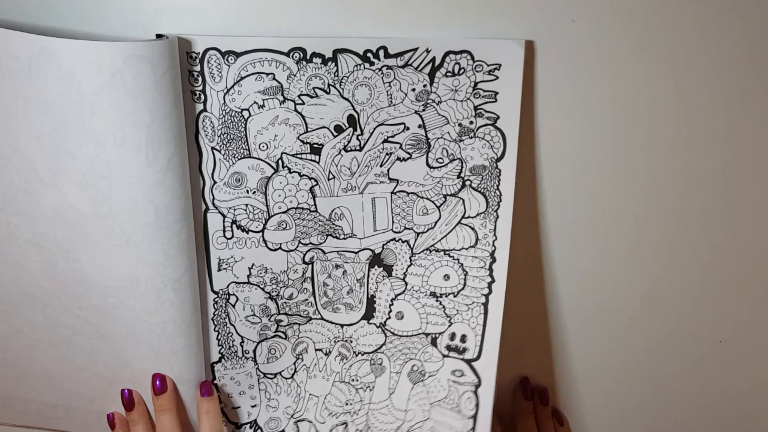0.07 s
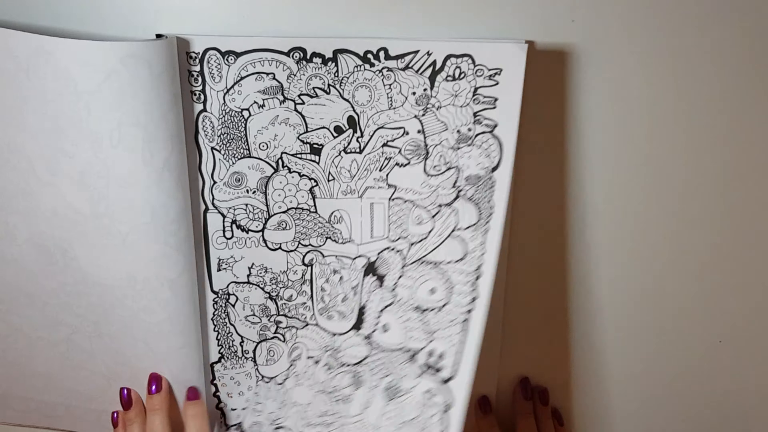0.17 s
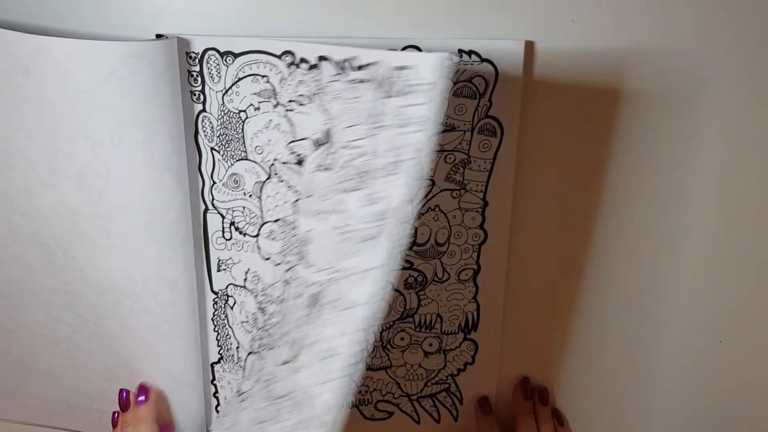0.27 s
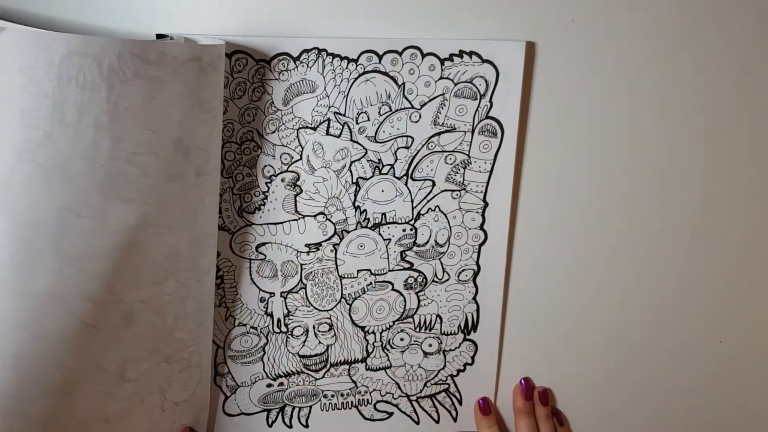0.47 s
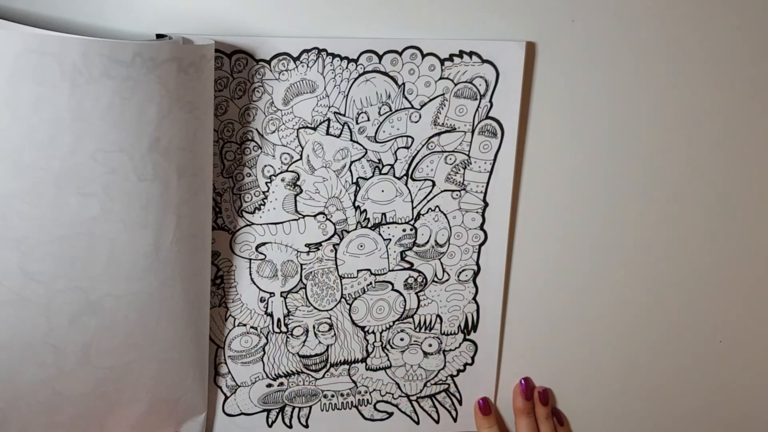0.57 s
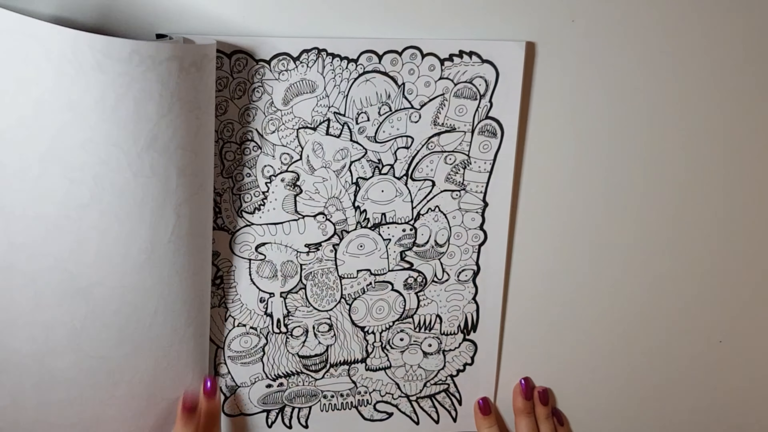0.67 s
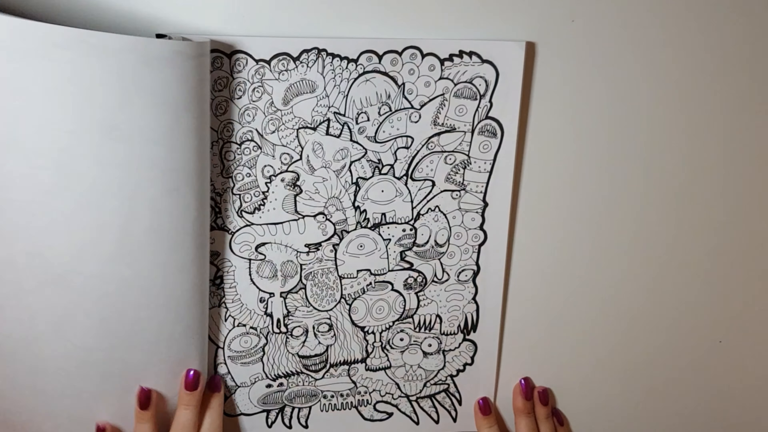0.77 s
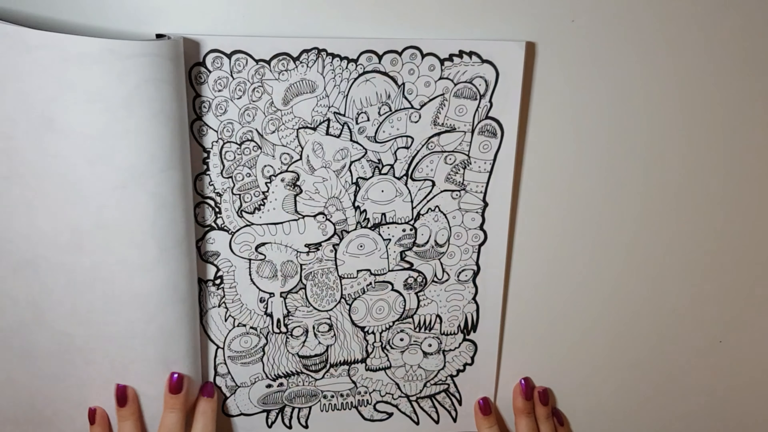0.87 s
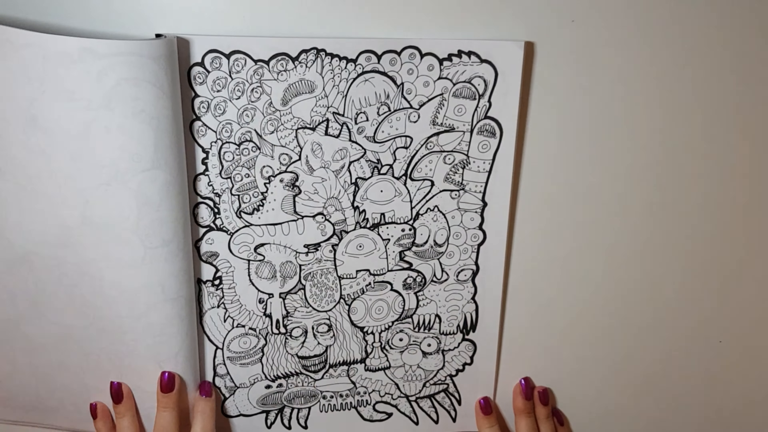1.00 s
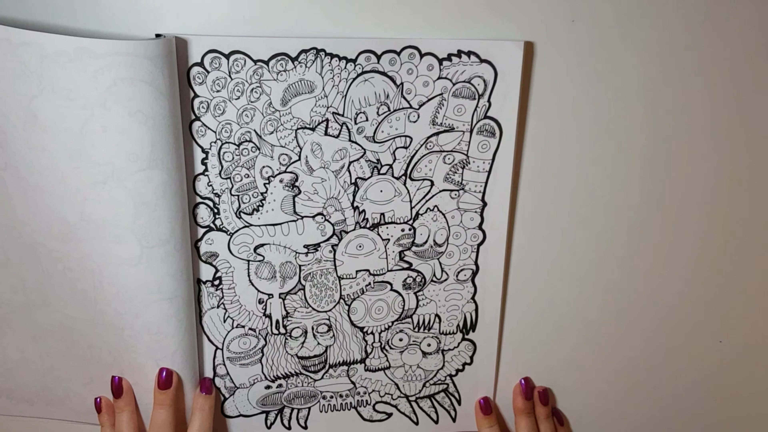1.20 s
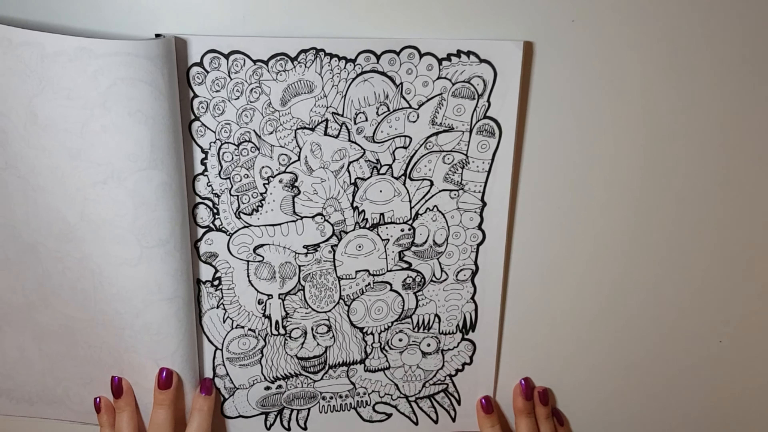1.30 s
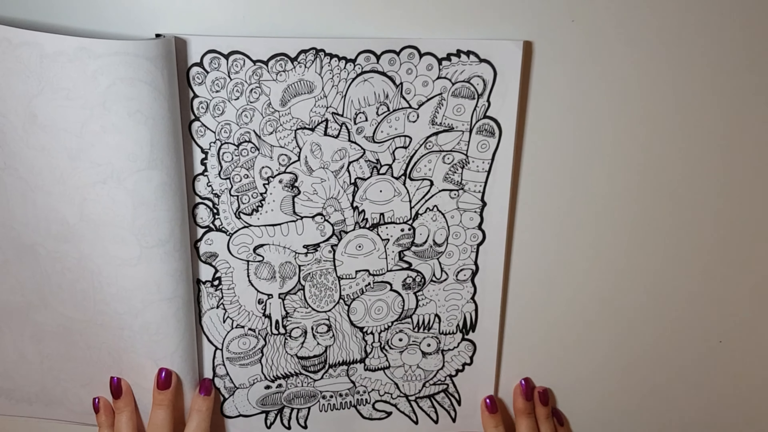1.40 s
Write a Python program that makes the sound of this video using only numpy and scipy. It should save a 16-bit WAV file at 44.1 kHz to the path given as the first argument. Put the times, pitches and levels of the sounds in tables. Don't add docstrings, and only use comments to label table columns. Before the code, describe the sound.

A large paper page is turned in a book, rustling, popping and crackling, then smoothed flat

```python
import sys
import numpy as np
from scipy import signal
from scipy.fft import rfft, irfft, next_fast_len
from scipy.io import wavfile

SR = 44100
rng = np.random.default_rng(int(sys.argv[2]) if len(sys.argv) > 2 else 0)


def to_wav(sig):
    pcm = np.clip(np.atleast_2d(sig), -1, 1) * 32767
    pcm = np.round(pcm).astype(np.int16)
    wavfile.write(sys.argv[1], SR, pcm.T)


def how_loud(loudness_db):
    steps = np.asarray(loudness_db, float) / 20
    return 10 ** steps


N = 63945

# [t/s, sliding speed as level/dB, pressure as body level/dB]
STROKES = [
    [(0.0, -59, 3), (0.026, -65.5, 3.5), (0.102, -56.5, -1.6), (0.228, -51, -2.3), (0.246, -59, 5),
     (0.3, -70.5, -23)],
    [(0.31, -66.5, 5.5), (0.482, -50, -0.8), (0.506, -55.5, 4.5), (0.596, -56.5, 0), (0.66, -70, 1)],
    [(0.67, -66, 2), (0.7, -62, -0.5), (0.748, -72, -11), (0.764, -68.5, 4), (0.767, -82, -9)],
    [(0.771, -51.5, 2), (0.873, -59.5, 2.5), (0.887, -52.5, 0), (0.901, -60.5, 3), (0.951, -53, -1),
     (0.995, -65, -0.7), (1.1, -68.5, -0.2)],
    [(1.11, -72, -15), (1.152, -80, -7), (1.176, -72, -10), (1.202, -65, -8.5), (1.272, -89.5, -2),
     (1.36, -97, 5)],
    [(1.375, -89, 11.5), (1.385, -77, 4.5), (1.397, -66, -2.5), (1.421, -60.5, 2.5), (1.443, -70.5, 2),
     (1.45, -59, 8)],
]
STROKE_SHEEN = [-2.5, -1, 1.5, 1, 3.2, 8]
# [f/Hz, level/dB per Hz]
FIBRE_SPECTRUM = [(1500, -16.5), (2500, -10), (3500, -8), (5300, -1), (7400, -7), (10500, -6.5),
                  (13500, -6.5), (15300, -11)]
# [f/Hz, level/dB per Hz]
BODY_SPECTRUM = [(350, -23), (550, -9.5), (900, -4), (1300, -4), (2300, 1), (3300, -2), (5000, -5.5),
                 (8000, -28)]
# [f/Hz, width/Hz, level/dB]
SHEET_RINGS = [(1150, 46, 2), (1717, 92, -1.5), (2630, 330, -5.5), (3713, 314, 2), (5225, 540, 1.5),
               (10500, 3200, -9)]
# [f/Hz, level/dB per Hz]
AIR_SPECTRUM = [(25, -28.5), (64, -.5), (110, -8), (170, -12.5), (350, -19.5), (1500, -24.5), (7000, -26.5),
                (13000, -22)]
# [f/Hz, likeness]
STEREO_LIKENESS = [(30, 0.64), (100, 0.29), (500, 0.53), (2000, 0.24), (5000, 0.041), (12000, 0.045)]
# [t/s, level/dB, length/s]
LEANS = [(.001, -68, 0.051), (0.198, -75, 0.06), (0.269, -56.5, 0.11), (0.377, -72, 0.05),
         (0.45, -54.5, 0.068), (0.486, -58.5, 0.12), (0.788, -70, .04), (0.886, -66, 0.086),
         (0.949, -71, 0.046), (1.004, -76, 0.054)]
# [f/Hz, level/dB]
TABLE_MODES = [(119, 4), (93, -9), (75, -9), (250, -12.5)]
# [t/s, peak level/dB, f/Hz, t60/s, left-right level/dB]
SHEET_SNAPS = [(.2752, -35, 1460, 0.035, 7), (.6201, -43.5, 650, 0.078, 3), (.6545, -45.5, 603, 0.13, 7),
               (.7692, -41.5, 1480, 0.041, 5.5), (.8823, -43, 1640, 0.082, -5),
               (1.4488, -38.5, 2540, .05, 5)]
# [t/s, peak level/dB, f/Hz, t60/s, left-right level/dB]
SHEET_CRUMPLES = [(.2802, -43, 696, 0.063, -1), (.3352, -46, 1280, 0.72, -2), (.414, -45, 930, 0.082, 12),
                  (.4282, -28, 1690, 0.082, 0), (.4332, -34, 656, 0.21, -4),
                  (.4402, -31.5, 1150, 0.057, -12), (.4465, -38.5, 635, .09, -1.5),
                  (.455, -40, 1760, 0.014, -9), (.4712, -37.5, 676, 0.1, 0), (.4872, -42, 760, 0.14, 3),
                  (.4952, -44, 2070, 0.17, 7), (.515, -40.5, 1320, 0.08, -1), (.58, -47, 537, 0.18, 0.5),
                  (.6782, -41.5, 820, 0.045, -1), (.6875, -41.5, 1450, 0.11, 0.5),
                  (.6852, -43.5, 656, 0.076, 0), (.704, -49, 1240, 0.15, -5), (.7762, -45, 1500, 0.14, -6),
                  (.798, -43.5, 1390, 0.19, 5), (.8884, -38, 2110, 0.05, -3.5),
                  (.894, -39, 1750, 0.091, 16.5), (.9482, -46.5, 897, 0.15, 6), (.725, -53, 800, 0.17, 6),
                  (1.0372, -54, 613, 0.21, 1), (.9152, -50.5, 477, 0.24, 2.5), (1.195, -64, 630, 0.13, 1),
                  (1.418, -73, 1570, 0.042, 1)]
# [t/s, peak level/dB, f/Hz, t60/s, left-right level/dB]
BRIGHT_CRACKS = [(.4302, -39, 2900, 0.05, 1.5), (.8822, -35, 3000, 0.035, 4), (.8842, -36, 5200, 0.03, 1.5),
                 (.4562, -41, 2300, .06, 4), (.2051, -42, 3200, .15, 9), (.2752, -39, 3200, .022, 3)]
# [t/s, peak level/dB, f/Hz, t60/s, left-right
# level/dB]
SHEET_POPS = [(.2683, -37, 1210, 0.016, -1), (.2750, -23, 1413, 0.018, 2.5), (.2751, -36, 3700, .012, 12.5),
              (.2756, -36.5, 732, 0.026, 4), (.4288, -33, 1050, 0.014, -8), (.4318, -39, 3600, .015, 1),
              (.4308, -42, 1590, 0.018, -3), (.4333, -31.5, 1290, 0.011, -3), (.4350, -31, 1790, 0.014, 7),
              (.4386, -36.5, 735, 0.022, -1), (.4415, -38.5, 696, 0.02, 10.5),
              (.4442, -30.5, 1330, .025, 4), (.4486, -35.5, 625, 0.044, 2.5), (.4528, -32.5, 735, .03, 3),
              (.4556, -34.5, 1700, 0.026, 1), (.4612, -42.5, 588, 0.025, 2), (.4728, -39.5, 710, .03, 2),
              (.4768, -39, 655, 0.016, 5), (.4405, -54, 330, 0.05, 1), (.4755, -50, 394, 0.05, 3.5),
              (.6846, -43.5, 713, 0.021, 0), (.6886, -47.5, 1950, 0.023, 3), (0.6913, -36, 1240, 0.019, 2),
              (0.695, -41, 957, 0.023, 3), (.6976, -44, 680, 0.024, 7), (0.7038, -45, 1314, 0.038, 9),
              (0.6802, -62, 256, 0.081, 4), (.6548, -43.5, 630, .055, 3), (.6212, -45, 640, .04, 1),
              (0.771, -49.5, 574, 0.045, 13), (.7696, -35, 1450, .028, 4), (.8002, -57, 360, .15, 3),
              (.7772, -41, 1820, 0.022, 6), (0.7988, -40.5, 1300, 0.04, -8), (0.8822, -32, 1250, .013, 3),
              (0.882, -27.5, 3200, 0.0084, 8), (0.8839, -34, 1900, 0.0092, 0),
              (.8857, -19.5, 1410, .013, 1), (.8848, -36, 520, .04, 2), (.8861, -29.5, 6380, 0.0073, -2),
              (.8877, -29, 2250, 0.0099, 10), (0.8874, -34.5, 5070, 0.0089, 12.5),
              (.8905, -31, 805, 0.018, 1), (0.8939, -34, 1660, 0.035, 10), (0.897, -36.5, 1710, 0.023, 3),
              (.9455, -42, 626, 0.022, 2.5), (.9552, -44, 840, 0.053, 9), (1.0445, -51.5, 555, 0.1, 6),
              (1.0428, -54, 1220, .04, -1)]

EDGE_DB, BODY_DB, SHEEN_HZ, HISS_LOW_HZ = 4, 1.5, 8900, 330
FIBRES_PER_S, FIBRE_SPREAD_DB = 8100, 0.5
SLIDE_PAN_DB, LIFT_PAN_DB = 4.5, 1.5
AIR_DB, THUMP_SWAY_DB = -69, 2
CRACKLES_PER_S = 4300
SNAP_TICK_DB, SNAP_RISE_S, SNAP_Q = 8.5, 0.00023, 4.2
CRUMPLE_TICK_DB, CRUMPLE_RISE_S, CRUMPLE_Q = -10, 0.0016, 4.45
OVERTONE, OVERTONE_DB, UNDERTONE, UNDERTONE_DB, CRACK_DB = 1.76, -16, 0.45, -10, -31
SHEET_LOW_HZ, SHEET_HIGH_HZ = 393, 10000
CONTACT_CYCLES = 4
POP_RISE_CYCLES, POP_OVERTONE, POP_OVERTONE_DB = 0.31, 2.16, -10
POP_PORT_TURN = .5
POP_LOW_HZ = 220
ROOM_T60_S, ROOM_DB, WALL_CUT_HZ = 0.36, -19, 8600
LAG_S = .0001
PORT_NOTCH_HZ, PORT_NOTCH_WIDTH_HZ, PORT_NOTCH = 6980, 2200, 0.63
TOP_CUT_HZ = 15600


def rms_one(x):
    return x / np.sqrt(np.mean(x ** 2) + 1e-20)


def at_hz(points, hz):
    table_hz, values = np.transpose(points)
    return np.interp(np.log(hz), np.log(table_hz), values)


def drift(rate_hz):
    r = np.exp(-80 * np.pi * rate_hz / SR)
    noise = rng.standard_normal(N // 40 + 2002)
    slow = rms_one(signal.lfilter([1], [1, -2 * r, r * r], noise)[2000:])
    return np.interp(np.arange(N) / 40, np.arange(len(slow)), slow)


def resonate(x, hz, width_hz):
    r = np.exp(-np.pi * width_hz / SR)
    feed = np.array([1, 0, -1]) * (1 - r * r) / 2
    return signal.lfilter(feed, [1, -2 * r * np.cos(2 * np.pi * hz / SR), r * r], x)


def filtered(x, order, hz, kind):
    return signal.sosfilt(signal.butter(order, hz, kind, fs=SR, output="sos"), x)


def panned(db, pan_db):
    return how_loud(db + pan_db * np.array([[.5], [-.5]]))


def grains(per_s, spread_db, shape):
    sizes = how_loud(spread_db * np.minimum(rng.exponential(1, shape), 4))
    signs = rng.choice([-1, 1], shape)
    return sizes * signs * (rng.random(shape) < per_s / SR)


def coloured(sources, spectrum, patchy_db):
    out = 0
    edges = 20 * 2 ** np.arange(0, 10.1, .5)
    for k, (low, high) in enumerate(zip(edges, edges[1:])):
        hz = np.sqrt(low * high)
        if hz < spectrum[0][0]:
            continue
        source = sources[k % 2]
        run_in = np.concatenate([source[:, -SR // 4:], source], axis=1)
        mid, side = filtered(run_in, 2, [low, high], "band")[:, -N:]
        alike = np.clip(at_hz(STEREO_LIKENESS, hz), -1, 1)
        gain = how_loud(at_hz(spectrum, hz) + patchy_db * drift(29))
        out = out + gain * (np.sqrt(1 + alike) * mid + np.sqrt(1 - alike) * side * [[1], [-1]])
    return rms_one(out)


def slides():
    t = np.arange(N) / SR
    times, speed_db, press_db = np.transpose(np.concatenate(STROKES))
    sheen_db = np.repeat(STROKE_SHEEN, [len(rows) for rows in STROKES])
    speed_db, press_db, sheen_db = (np.interp(t, times, c) for c in (speed_db, press_db, sheen_db))
    fibres = grains(FIBRES_PER_S, FIBRE_SPREAD_DB, (2, 2, N))
    edge = how_loud(EDGE_DB) * coloured(fibres, FIBRE_SPECTRUM, patchy_db=1.34)
    sheen = signal.sosfiltfilt(signal.butter(2, SHEEN_HZ, "high", fs=SR, output="sos"), edge)
    body = how_loud(BODY_DB + press_db) * coloured(fibres[::-1], BODY_SPECTRUM, patchy_db=2.2)
    hiss = edge + (how_loud(sheen_db) - 1) * sheen + body
    hiss = hiss + sum(how_loud(db) * resonate(hiss, hz, width) for hz, width, db in SHEET_RINGS)
    hiss = filtered(hiss, 4, HISS_LOW_HZ, "high")
    pan_db = SLIDE_PAN_DB + LIFT_PAN_DB * (t < np.float64(.26))
    return panned(speed_db + drift(27), pan_db) * hiss


def room_air():
    return how_loud(AIR_DB) * coloured(rng.standard_normal((2, 2, N)), AIR_SPECTRUM, patchy_db=-0.6)


def thumps():
    t, out = np.arange(N) / SR, 0
    for s, db, length in LEANS:
        part = np.clip((t - s) / length, 0, 1)
        push = np.sin(np.pi * part ** 0.38) ** 2
        for hz, level_db in TABLE_MODES:
            out = out + how_loud(db + level_db) * push * np.sin(2 * np.pi * hz * (t - s))
    sway_db = THUMP_SWAY_DB * drift(18) * np.array([[1], [-1]])
    return out * how_loud(2.1 * drift(28) + sway_db)


def buckles(rows, tick_db, rise_s, q):
    out, t = np.zeros((2, N + SR)), np.arange(SR // 4) / SR
    for s, db, hz, t60, pan_db in rows:
        crackle = grains(CRACKLES_PER_S, 1.5, (2, len(t))) * (1 - np.exp(-t / rise_s))
        crackle[1] = 0.37 * crackle[0] + 0.64 * crackle[1]
        crackle[:, 0] += how_loud(tick_db)
        crackle = crackle * how_loud(-60 * t / max(t60, .005)) + 1e-18
        tone = resonate(resonate(crackle, hz, hz / q), hz, 2.6 * hz / q)
        over = resonate(crackle, OVERTONE * hz, 0.46 * hz) * how_loud(OVERTONE_DB)
        under = resonate(crackle, UNDERTONE * hz, 0.48 * hz) * how_loud(UNDERTONE_DB)
        crack = resonate(crackle, 6600, 3450) * how_loud(CRACK_DB)
        ring = filtered(tone - over - under + crack, 5, [SHEET_LOW_HZ, SHEET_HIGH_HZ], "band")
        ring = filtered(ring, 2, min(CONTACT_CYCLES * hz, .4 * SR), "low")
        i = int(s * SR)
        out[:, i:i + len(t)] += panned(db, pan_db) * ring / np.abs(ring).max()
    return out[:, :N]


def pops(rows):
    out, t = np.zeros((2, N + SR)), np.arange(SR // 4) / SR
    for s, db, hz, t60, pan_db in rows:
        fall = how_loud(-60 * t / max(t60, .004))
        turn = 2 * np.pi * hz * t + POP_PORT_TURN * np.array([[-.5], [.5]])
        ring = np.sin(turn) + how_loud(POP_OVERTONE_DB) * fall * np.sin(POP_OVERTONE * turn)
        ring = -ring * fall * (1 - np.exp(-t * hz / POP_RISE_CYCLES))
        i = int(s * SR)
        out[:, i:i + len(t)] += panned(db, pan_db) * ring / np.abs(ring).max()
    return filtered(out[:, :N], 2, POP_LOW_HZ, "high")


def room(x):
    size = next_fast_len(N + SR)
    hz = np.arange(size // 2 + 1) * SR / size
    out = np.zeros((2, N))
    for k, lag in enumerate(rng.uniform(.009, .03, 12)):
        wall = how_loud(-60 * lag / ROOM_T60_S) / (1 + 1j * hz / WALL_CUT_HZ)
        loop = wall * np.exp(-2j * np.pi * hz * lag)
        echoes = irfft(rfft(x[k % 2], size) * loop / (1 - loop), size)[:N]
        out[k % 2] += echoes * (-1) ** (k // 2)
    return out


def scene():
    page = slides()
    page += buckles(SHEET_SNAPS, SNAP_TICK_DB, SNAP_RISE_S, SNAP_Q)
    page += buckles(SHEET_CRUMPLES + BRIGHT_CRACKS, CRUMPLE_TICK_DB, CRUMPLE_RISE_S, CRUMPLE_Q)
    page += pops(SHEET_POPS)
    page[0] = np.interp(np.arange(N) - LAG_S * SR, np.arange(N), page[0])
    return page + thumps() + how_loud(ROOM_DB) * room(page) + room_air()


def top_cut(x):
    return signal.sosfilt(signal.butter(12, 16410, fs=SR, output="sos"), x)


def record(dry):
    mix = dry - PORT_NOTCH * resonate(dry, PORT_NOTCH_HZ, PORT_NOTCH_WIDTH_HZ)
    mix = signal.sosfilt(signal.ellip(10, .5, 70, TOP_CUT_HZ, fs=SR, output="sos"), mix)
    return top_cut(mix)


dry = scene()
out = record(dry)
to_wav(out)
```